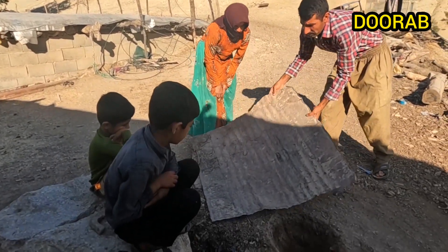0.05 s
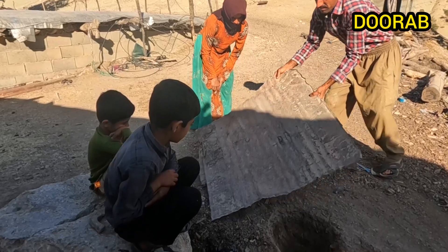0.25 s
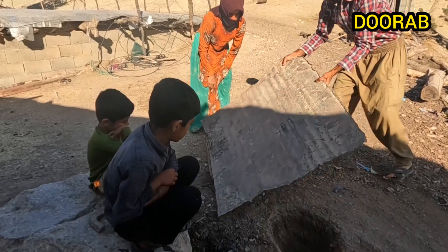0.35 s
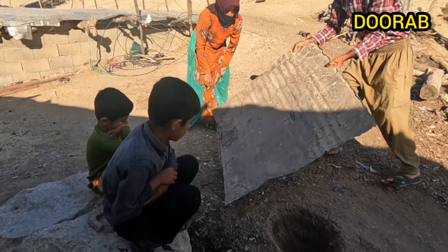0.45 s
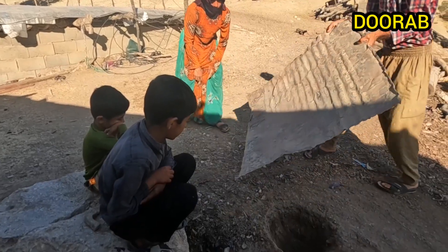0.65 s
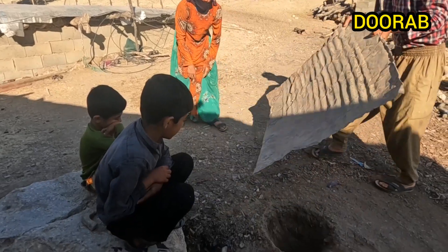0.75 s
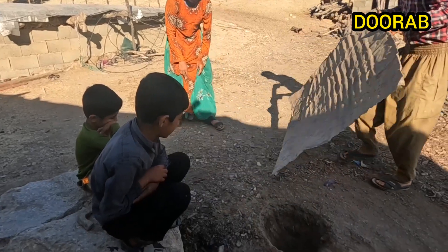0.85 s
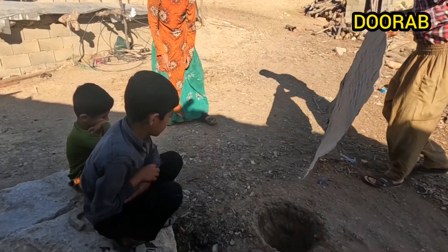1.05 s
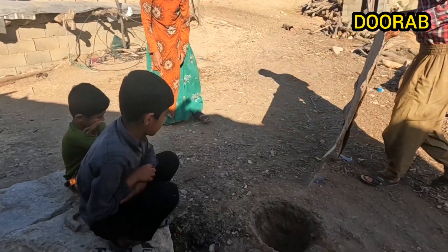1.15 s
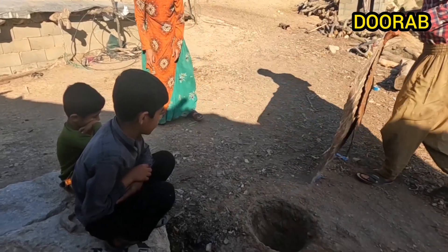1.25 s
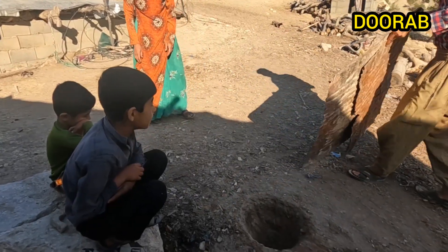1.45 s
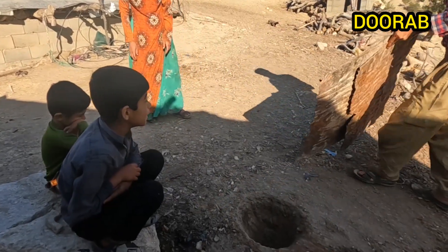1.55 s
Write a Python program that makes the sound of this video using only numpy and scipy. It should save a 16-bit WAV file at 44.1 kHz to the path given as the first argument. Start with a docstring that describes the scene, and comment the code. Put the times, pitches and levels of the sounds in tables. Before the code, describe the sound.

A corrugated metal sheet drags over dry dirt from the start, gritty and rasping, with a low flexing boom. Knocks at about 0.2 to 0.35 s lead to the loudest, a bright short-ringing clang at 0.41 s. Scraping fades by 0.6 s; pebbles tick around 0.7 to 0.8 s, with a small knock at 0.92 s. Sparse, quiet scuffs follow, then a cluster of ticks from 1.4 s, over light wind buffets and faint outdoor hiss.

```python
"""A corrugated metal sheet is dragged over dry dirt in an open yard and tipped upright: grit scrapes and rings in it
(grain impulses through resonances), it booms as it flexes (resonant noise) and knocks on stones (decaying modes, dense
clang, crack). It scuffs up dirt (short noise hisses) and pebbles tick off it (short tones with a crack).
Light wind (low noise, single buffets) hits the two microphone ports over a faint outdoor hiss (shaped noise)."""
import sys
import numpy as np
from scipy import signal
from scipy.fft import rfft, irfft, next_fast_len
from scipy.io import wavfile
from scipy.ndimage import map_coordinates

SR = 44100
rng = np.random.default_rng(int(sys.argv[2]) if len(sys.argv) > 2 else 0)


def to_linear_factor(level_db):
    """Convert decibel levels (scalar or array-like) to linear amplitude factors."""
    exponent = np.asarray(level_db, float) / 20
    return 10 ** exponent


def bounce(signal):
    """Save signal as a 16-bit WAV file at the path given by the first command-line argument."""
    frames = np.transpose(np.atleast_2d(signal))
    limited = np.clip(frames, -1, 1)
    pcm = np.round(limited * 32767).astype(np.int16)
    wavfile.write(sys.argv[1], SR, pcm)


N = 70560  # samples, 1.6 s


def unit(x):
    """Scales to an rms of 1."""
    return x / np.sqrt(np.mean(x ** 2) + 1e-20)


def along(points, hz):
    """Interpolates (frequency [Hz], value) points on a log frequency axis."""
    f, v = np.transpose(points)
    return np.interp(np.log(hz + 1), np.log(f + 1), v)


def curves(rows):
    """One value per sample for each column after the time."""
    s, *columns = np.transpose(rows)
    return [np.interp(np.arange(N) / SR, s, column) for column in columns]


def wobble(knots_per_s):
    """A smooth random curve."""
    knots = rng.standard_normal(int(N * knots_per_s / SR) + 4)
    return map_coordinates(knots, [np.arange(N) * knots_per_s / SR])


def filtered(x, response):
    """x times a complex response of frequency."""
    n = x.shape[-1]
    m = next_fast_len(n + SR // 4)
    return irfft(rfft(x, m) * response(np.fft.rfftfreq(m, 1 / SR)), m)[..., :n]


def coloured(x, spectrum):
    """x filtered by a (frequency [Hz], level [dB]) spectrum."""
    return filtered(x, lambda hz: to_linear_factor(along(spectrum, hz)))


def resonances(table):
    """Causal response of damped resonances in parallel, signs alternating."""
    def response(f):
        return sum((-1) ** k * to_linear_factor(db) * 1j * f * width / (c * c - f * f + 1j * f * width)
                   for k, (c, width, db) in enumerate(table))
    return response


def bell(centre_hz, width_oct):
    """Gaussian band on an octave axis."""
    return lambda hz: np.exp(-0.5 * (np.log2((hz + 1) / centre_hz) / width_oct) ** 2)


def octaves(hz):
    """Octaves above 1 kHz."""
    return np.log2((hz + 1) / 1000)


def dying(t60s, count):
    """Half a second of noise in which each frequency dies at its own speed."""
    hz, t, z = signal.stft(rng.standard_normal((count, SR // 2)), SR, nperseg=128)
    z = z * to_linear_factor(-60 * t / t60s(hz)[:, None])
    return signal.istft(z, SR, nperseg=128)[1][:, :SR // 2]


def pair(spectrum, alike):
    """Two noises of one colour, their correlation set by alike."""
    a, b = coloured(rng.standard_normal((2, N)), spectrum)
    u = np.arccos(alike) / 2
    return unit(np.array([np.cos(u) * a + np.sin(u) * b, np.cos(u) * a - np.sin(u) * b]))


def add(out, s, x):
    """Mixes x in at time s."""
    i = round(s * SR)
    out[..., i:i + x.shape[-1]] += x[..., :out.shape[-1] - i]


# hiss spectrum: (frequency [Hz], relative level [dB per Hz])
HISS_SPECTRUM = [(150, -32.5), (250, -2), (415, -6.5), (702, -14), (978, -13), (1070, -22.5), (1170, -8),
                 (1540, -11), (2350, -18.5), (7190, -12.5), (8560, -15.5), (12100, -22), (15000, -26.5),
                 (16400, -51.5)]
HISS_DB, HISS_ALIKE = -66.5, 0.22


def yard_hiss():
    """Outdoor hiss: shaped noise, slightly unsteady, mostly unlike at the two ports."""
    level_db = HISS_DB + 0.73 * wobble(13.3)
    return to_linear_factor(level_db) * pair(HISS_SPECTRUM, HISS_ALIKE) * to_linear_factor([[-0.6], [0.6]])


# wind on the ports: (time [s], mean level [dB])
GUSTS = [(0.0, -51.5), (0.352, -50.5), (0.418, -46.5), (0.654, -50), (0.68, -57), (0.836, -53),
         (0.908, -51.5), (0.958, -51.5), (1.154, -60), (1.202, -57.5), (1.242, -53.5), (1.296, -56),
         (1.434, -55), (1.6, -58)]
# wind spectrum: (frequency [Hz], relative level [dB per Hz])
RUMBLE = [(6, -35.5), (14, -0.5), (28, -10), (48, -14), (70, -23.5), (130, -23), (250, -31.5), (400, -53.5),
          (700, -120)]
# single buffets: (time [s], mean peak level [dB], length [s])
PUFFS = [(.533, -50, 0.012), (0.591, -38.5, 0.015), (0.643, -37.5, 0.02), (0.771, -48, 0.019),
         (0.897, -53, 0.013), (1.138, -42, 0.021), (1.451, -47, 0.042)]
WIND_ALIKE = 0.79


def wind():
    """Turbulent pressure on the ports: low noise plus single pressure swings, stronger on the right."""
    gust_db, = curves(GUSTS)
    gusts = to_linear_factor(gust_db + 0.61 * wobble(12.1)) * pair(RUMBLE, WIND_ALIKE)
    t = np.arange(N) / SR
    puffs = np.zeros(N)
    for s, db, length_s in PUFFS:
        u = 2 * (t - s) / length_s
        puffs += to_linear_factor(db) * (1 - u * u) * np.exp(-u * u / 2)
    return (gusts + puffs) * to_linear_factor([[-1.8], [1.8]])


# dirt thrown up: (time [s], level [dB], centre [Hz], t60 [s], width [octaves])
SCUFFS = [(.02, -50, 4670, 0.098, 0.7), (.181, -49.5, 5700, 0.11, 0.14), (0.244, -45.5, 7300, 0.27, 0.4),
          (0.641, -52.5, 8460, 0.2, 0.3), (0.649, -57, 11000, 0.086, .6), (0.672, -47, 4740, 0.088, 0.33),
          (0.734, -56.5, 5000, 0.057, 0.64), (0.854, -46.5, 5200, 0.15, 0.73),
          (0.943, -62, 6550, 0.13, 0.68), (1.128, -58, 4150, 0.12, 0.99), (1.0, -53, 5600, 0.037, 0.62),
          (1.05, -68, 3700, 0.5, 0.17), (.34, -56, 5700, 0.33, 0.57), (.343, -45.5, 2250, 0.19, 0.16)]
SCUFF_RISE_S = 0.0018


def scuffs():
    """Thrown dirt: dense fine grains with a quick rise, dying away."""
    out, t = np.zeros(N), np.arange(SR // 3) / SR
    for s, db, centre_hz, t60_s, width_oct in SCUFFS:
        fine = rng.standard_normal(len(t)) * to_linear_factor(1.1 * rng.exponential(size=len(t)))
        hiss = unit(filtered(fine, bell(centre_hz, width_oct)))
        add(out, s, to_linear_factor(db - 60 * t / t60_s) * (1 - np.exp(-t / SCUFF_RISE_S)) * hiss)
    return out


# single pebbles: (time [s], level [dB], frequency [Hz], t60 [s])
TICKS = [(0.7137, -29, 1250, 0.015), (0.7244, -35, 1140, 0.015), (0.741, -38.5, 1420, 0.014),
         (0.77, -45, 2370, 0.0042), (.819, -41, 1345, 0.022), (0.708, -35, 1200, 0.012),
         (0.947, -43.5, 5750, 0.018), (0.969, -43, 9600, .008), (1.04, -37.5, 7500, 0.0046),
         (1.186, -49.5, 9260, 0.0055), (1.236, -51.5, 9570, 0.0048), (1.413, -43.5, 1240, 0.019),
         (1.437, -36, 1400, 0.016), (1.459, -39.5, 6960, 0.0063), (1.481, -42.5, 3550, 0.023),
         (1.497, -40, 1480, 0.0068), (1.5, -42, 7580, 0.013), (1.502, -30.5, 1250, 0.0083),
         (1.515, -40, 1060, 0.011), (1.527, -44, 1280, 0.041), (1.537, -38, 1450, 0.0057),
         (1.5495, -34, 2690, 0.005), (1.559, -31.5, 920, 0.0044)]
TICK_CRACK_DB, TICK_CRACK_T60_S, TICK_RISE_S = -0.5, 0.0044, 0.00036  # crack level relative to the ring


def ticks():
    """A pebble: one short ring with a small noise crack."""
    out, t = np.zeros(N), np.arange(SR // 20) / SR
    for s, db, hz, t60_s in TICKS:
        ring = to_linear_factor(-60 * t / t60_s) * np.sin(2 * np.pi * hz * t)
        crack = unit(filtered(rng.standard_normal(len(t)), bell(hz, 0.7)))
        x = ring + to_linear_factor(TICK_CRACK_DB - 60 * t / TICK_CRACK_T60_S) * crack
        add(out, s, to_linear_factor(db) * x * (1 - np.exp(-t / TICK_RISE_S)))
    return out


# blows on stones: (time [s], level [dB], brightness [dB per octave], damping factor, free ringing share [0-1])
KNOCKS = [(0.193, -25.5, 7, 0.95, 0), (.197, -24.5, -4.5, 1.17, 0.54), (.247, -27.5, -5, 0.6, 0.68),
          (0.34, -34, -8, 0.73, 1), (.4145, -10.5, 1.35, 1.68, 0.9), (.427, -18, -2, 1.17, 0.92),
          (.456, -22, -2, 0.71, 0.37), (0.676, -37, -1, 1.3, 0.32), (0.856, -43.5, 5, 0.62, 0.25),
          (.920, -30, -3, 0.92, 0.26)]
# clear modes: (frequency [Hz], relative level [dB], t60 at damping factor 1 [s])
RING = [(835, -15, .15), (929, 0, .32), (1051, -4, .25), (1104, -3, .26), (1410, -6, .26), (1517, -5, .2),
        (1647, -5, .36), (1740, -13, .2), (2447, -12, .2), (2640, -16, .26), (2800, -16, .36),
        (3038, -10, .28), (3225, -15, .15), (3386, -7, .09), (3505, -5, .1), (3990, -8, .06),
        (4545, -11, .1), (5030, -9, .09), (5224, -5, .075), (5640, -10, .12), (6110, -18, .1)]
# modes too dense to tell apart: (frequency [Hz], relative level [dB per Hz])
CLANG = [(180, -55), (300, -37), (830, -25.5), (1040, 2.5), (1260, -8.5), (1370, -7.5), (1630, -10),
         (2050, -28.5), (2470, -18), (4820, -13), (5420, -14.5), (10900, -26.5), (16400, -46.5)]
# their decay: (frequency [Hz], t60 at damping factor 1 [s])
CLANG_T60 = [(500, 0.42), (1200, 0.24), (3000, 0.15), (6000, 0.13), (9000, 0.081), (14000, 0.04)]
# blow with the sheet held fast in the dirt: (frequency [Hz], relative level [dB per Hz])
THUD = [(120, -48.5), (200, -18.5), (496, -17), (693, -30), (965, -4), (1060, -7.5), (1180, 2),
        (1310, -14.5), (1460, 0.5), (1950, -4.5), (2220, -13.5), (2450, -7), (3050, -5.5), (3400, -13),
        (4470, -22), (9000, -49.5), (11700, -54), (19800, -120)]
RING_DB, CLANG_DB, CRACK_DB = -10.5, -12, 0  # relative to the level of the blow
CRACK_T60_S, RISE_S = 0.016, 0.0012
BEND_RAD_PER_KHZ = 0.22  # the moving sheet bends its modes


def knocks():
    """Each blow rings the clear modes anew, over a dense clang and a crack; a held sheet thuds instead."""
    out, t = np.zeros(N), np.arange(SR // 2) / SR
    for s, db, tilt, damp, free in KNOCKS:
        drift = BEND_RAD_PER_KHZ * map_coordinates(rng.standard_normal(24), [40 * t])
        ring = np.zeros(len(t))
        for hz, mode_db, t60_s in RING:
            decay_db = mode_db + tilt * octaves(hz) + rng.normal() - 60 * t * damp / t60_s
            phase = rng.uniform(0, 2 * np.pi) + drift * hz / 1000 * rng.normal()
            ring += to_linear_factor(decay_db) * np.sin(2 * np.pi * hz * t + phase)

        def colour(hz):
            return to_linear_factor(free * along(CLANG, hz) + (1 - free) * along(THUD, hz) + tilt * octaves(hz))

        clang = filtered(dying(lambda hz: along(CLANG_T60, hz) / damp, count=1)[0], colour)
        clang = clang / clang[:SR // 100].std()
        crack = unit(filtered(rng.standard_normal(len(t)), colour)) * to_linear_factor(-60 * t / CRACK_T60_S)
        x = to_linear_factor(RING_DB) * free * ring + to_linear_factor(CLANG_DB) * clang + to_linear_factor(CRACK_DB) * crack
        add(out, s, to_linear_factor(db) * x * (1 - np.exp(-t / RISE_S)))
    return out


GRIT_PER_S, GRIT_SPREAD_DB, FINE_SHARE = 1200, 3, 0.4  # typical grain rate


def grit():
    """Clumped grains of uneven size, as single pushes, over fine sand."""
    when, size, sign = rng.random((3, N))
    hits = when < GRIT_PER_S * to_linear_factor(3 * wobble(60)) / SR
    grains = hits * to_linear_factor(-GRIT_SPREAD_DB * np.log(size + 0.0052)) * np.sign(sign - 0.5)
    return (1 - FINE_SHARE) * unit(grains) + FINE_SHARE * rng.standard_normal(N)


# edge on the ground: (time [s], ringing scrape before tilt [dB], brightness [dB per octave],
# ploughed dirt [dB], flexing boom [dB])
DRAG = [(0.0, -48.5, 1, -53.5, -38), (0.04, -45, 1.6, -46, -46.5), (0.102, -54, 2.2, -51.5, -48.5),
        (0.132, -54.5, 3.5, -48.5, -44), (0.164, -52.5, 1.5, -54.5, -56), (0.198, -46, 1.5, -45, -50),
        (0.236, -42.5, -0.9, -46.5, -46.5), (0.258, -41.5, -3.5, -36.5, -42.5),
        (0.32, -48, 1.6, -44.5, -42), (0.362, -41.5, 0.7, -40, -34.5), (0.396, -44.5, -0.7, -39.5, -45.5),
        (0.418, -46, 5.5, -40, -40), (0.484, -50.5, 3.5, -45.5, -54), (0.51, -55, -5.5, -59.5, -51),
        (0.576, -64.5, 6, -60, -58), (0.61, -76, 9.5, -78, -70), (0.64, -55, 1, -68, -64),
        (0.66, -63, 7, -75, -71.5), (0.694, -44.5, -7, -67, -49), (0.72, -50, -0.5, -54.5, -62),
        (0.788, -61, 0.2, -70, -67.5), (0.82, -62.5, 5.5, -65.5, -63), (0.87, -76, 10.5, -96, -73),
        (0.904, -74, 2, -96, -99), (0.926, -78.5, 10, -53.5, -57.5), (1.022, -70.5, 5, -66, -60.5),
        (1.174, -73.5, 1, -84.5, -86), (1.286, -70, -0.5, -92.5, -79), (1.37, -75.5, -4.5, -84.5, -81),
        (1.385, -91, 4, -93, -82), (1.405, -63.5, 6.5, -64, -68), (1.43, -57.5, 4.5, -57.5, -60.5),
        (1.45, -58.5, 3, -71, -62), (1.49, -59.5, 3, -60.5, -77), (1.525, -57.5, 4, -65, -63),
        (1.55, -63.5, 5, -65, -67), (1.6, -54, 1.5, -59, -72)]
# grit heard through the sheet: (frequency [Hz], relative level [dB per Hz])
SCRAPE = [(250, -71.5), (410, -52), (700, -22.5), (830, -11), (1310, -0.5), (1970, -2.5), (2560, -10.5),
          (5840, -16), (7490, -16.5), (12200, -28.5), (14400, -50), (16000, -53.5)]
# sheet modes damped by the dirt: (frequency [Hz], width [Hz], relative level [dB])
BODY = [(980, 96, 10), (1120, 58, 16), (1330, 200, 3), (1543, 33, 10), (1701, 36, 0.5), (2340, 470, -24.5),
        (2952, 1150, 3.5)]
# soil pushed by the edge: (frequency [Hz], relative level [dB per Hz])
DIRT = [(160, -27), (280, -6), (612, 1), (698, -0.5), (774, -4), (900, 2.5), (1170, -22), (1980, -120)]
# flexing modes, response squared in use: (frequency [Hz], width [Hz], relative level before squaring [dB])
FLEX = [(159.5, 18, -4), (252, 44, -3.5), (123, 115, -8.5)]
BODY_SHARE = 0.45


def drag():
    """Grit rings in the dirt-damped sheet, brighter or duller with the tilt; soil rasps, the flexing sheet booms."""
    scrape_db, tilt, dirt_db, boom_db = curves(DRAG)
    body = resonances(BODY)

    def through_sheet(hz):
        return to_linear_factor(along(SCRAPE, hz)) * (1 - BODY_SHARE + BODY_SHARE * 2 * body(hz))

    scrape = unit(filtered(grit(), through_sheet))
    hz, t, z = signal.stft(scrape, SR, nperseg=256)
    frame_tilt = np.interp(t, np.arange(N) / SR, tilt)
    z = z * to_linear_factor(octaves(np.maximum(hz, 500))[:, None] * frame_tilt)
    scrape = signal.istft(z, SR, nperseg=256)[1][:N]
    dirt = unit(coloured(grit(), DIRT))
    boom = unit(filtered(rng.standard_normal(N), lambda hz: resonances(FLEX)(hz) ** 2))
    return to_linear_factor(scrape_db) * scrape + to_linear_factor(dirt_db) * dirt + to_linear_factor(boom_db) * boom


# the sheet swings across: (time [s], left over right [dB])
PAN = [(0.0, 0), (0.56, 0.0), (0.802, -1.5), (1.042, -1.0), (1.068, 0), (1.118, -1), (1.6, -1.5)]


def swing(sheet):
    """Splits the level between left and right as the sheet moves."""
    pan_db, = curves(PAN)
    return sheet * to_linear_factor(np.array([pan_db, -pan_db]) / 2)


# ground and walls of the yard: (frequency [Hz], t60 [s])
YARD = [(300, 0.45), (2000, 0.17), (6000, 0.083), (12000, 0.0067)]
# scattered over direct sound: (frequency [Hz], level [dB])
WET = [(150, -20), (800, -20), (1300, -14.5), (4500, -7), (9000, -7.5), (12500, -1)]


def yard_echo(sheet):
    """Scattered sound: a decaying noise tail for each side, 60 samples late, treble dying sooner."""
    tail = dying(lambda hz: along(YARD, hz), count=2)
    tail = tail / tail[:, :64].std()

    def level(hz):
        unit_energy = np.sqrt(2 * np.log(1000) / along(YARD, hz) / SR)
        return to_linear_factor(along(WET, hz)) * unit_energy

    late = np.pad(sheet.mean(0), (60, 0))[None]
    return signal.fftconvolve(late, filtered(tail, level), axes=1)[:, :N]


# pair of ports: (frequency [Hz], left lead [rad], left over right [dB])
PORTS = [(0, 0, 0), (1030, -.55, .5), (1720, -1.05, -2.5), (2410, -.25, -.5), (3100, -.75, 1),
         (3790, -1.05, -1), (4480, -.7, -3.5), (5170, -.1, -1.5), (5860, -.6, 2), (7240, -.7, -2),
         (8600, -.1, -.5), (10700, -.2, 4.5), (12400, -.9, 5), (16000, -.5, 4)]


def ports(x):
    """Phase and level difference between the two ports, split evenly over both."""
    side = np.array([[0.5], [-0.5]])
    f, lead_rad, balance_db = np.transpose(PORTS)

    def response(hz):
        return np.exp(1j * side * np.interp(hz, f, lead_rad)) * to_linear_factor(side * np.interp(hz, f, balance_db))

    return filtered(x, response)


def scene():
    """The swinging sheet and its yard echo reach the two ports, over wind and hiss."""
    sheet = swing(drag() + scuffs() + ticks() + knocks())
    return ports(sheet + yard_echo(sheet)) + (wind() + yard_hiss())


def band_limit(x):
    """A steep low-pass at the top of the band."""
    return signal.sosfilt(signal.butter(12, 16500, fs=SR, output="sos"), x)


# treble loss of the microphone: (frequency [Hz], level [dB])
MIC = [(6800, 0), (8300, -6.5), (12500, -2.5), (14500, -12.5), (16000, -20.5)]


def record(dry):
    """The microphone loses treble."""
    mix = coloured(dry, MIC)
    return band_limit(mix)


dry = scene()
out = record(dry)
bounce(out)
```